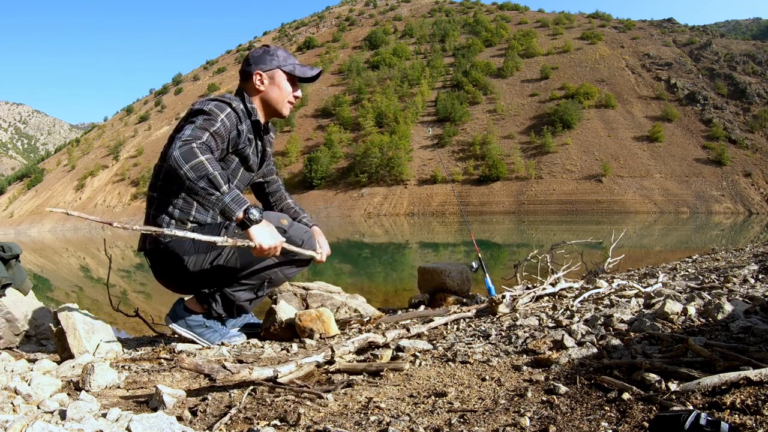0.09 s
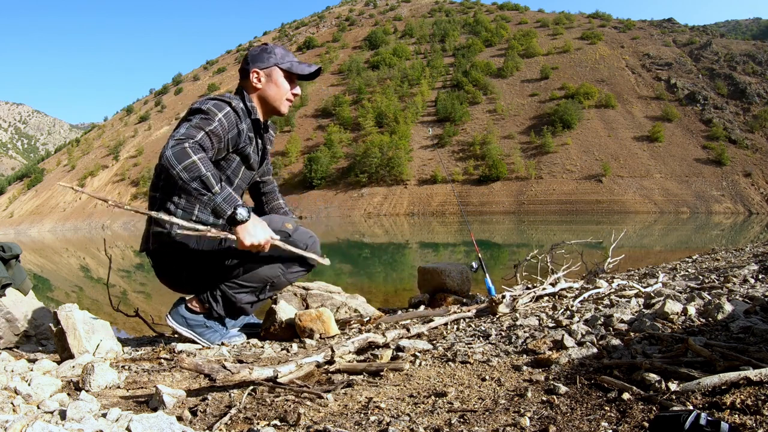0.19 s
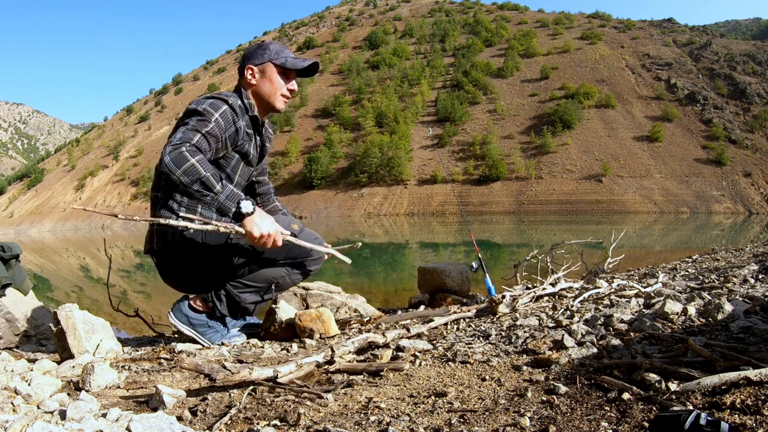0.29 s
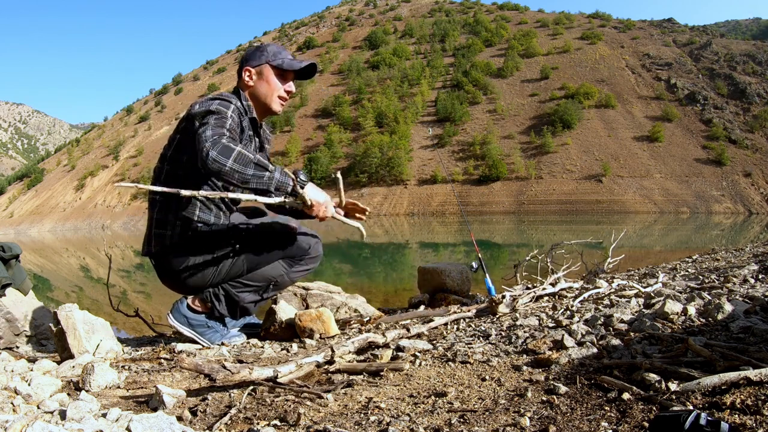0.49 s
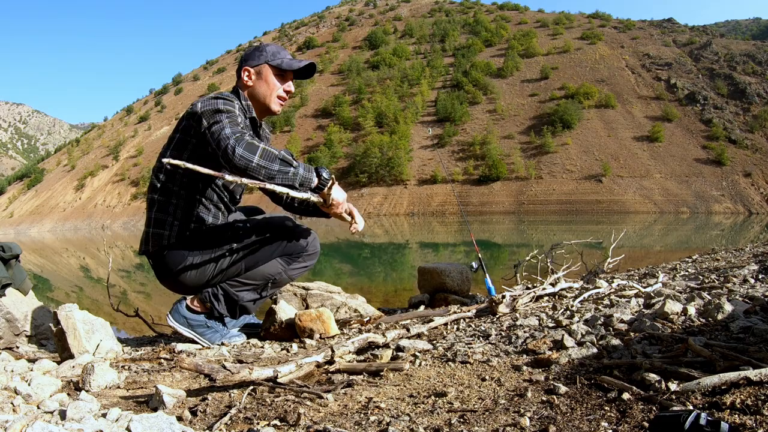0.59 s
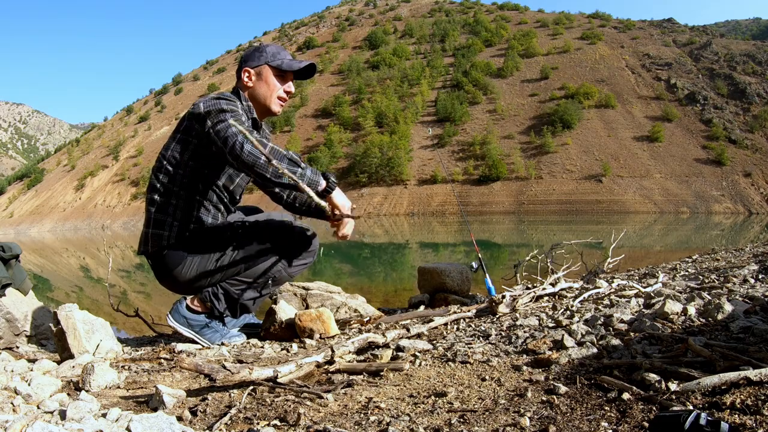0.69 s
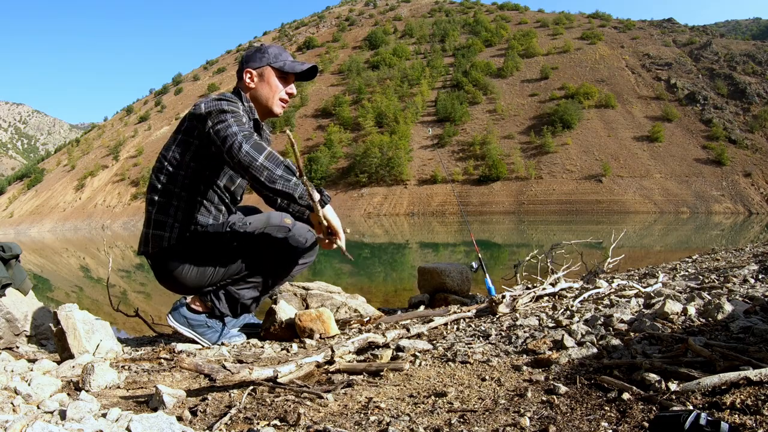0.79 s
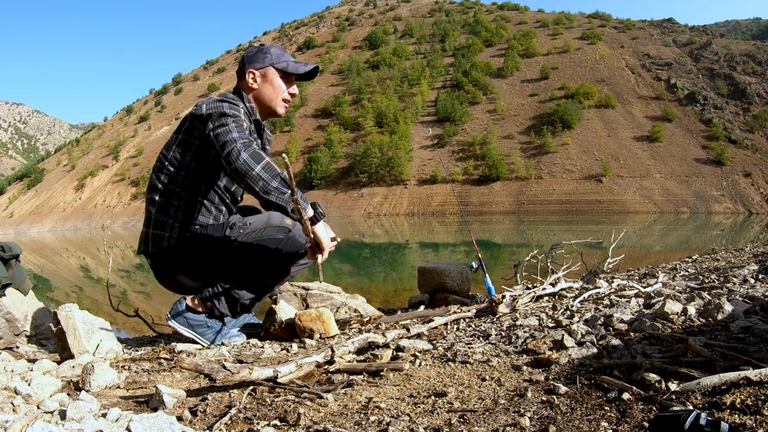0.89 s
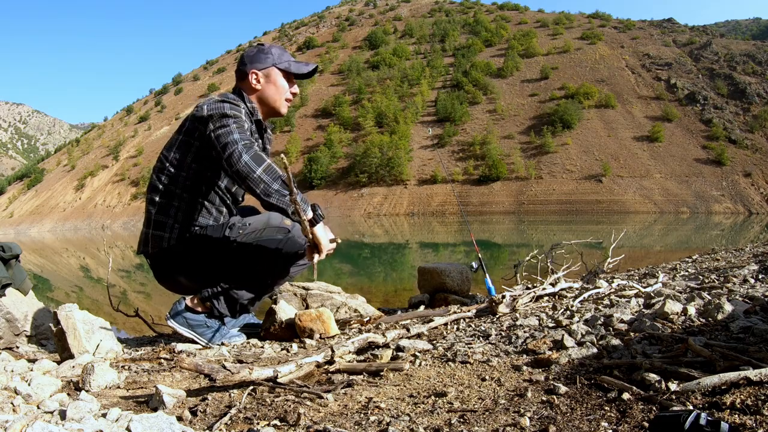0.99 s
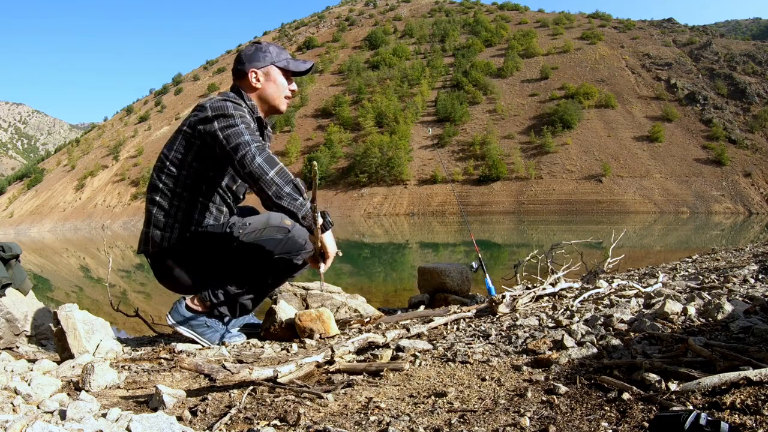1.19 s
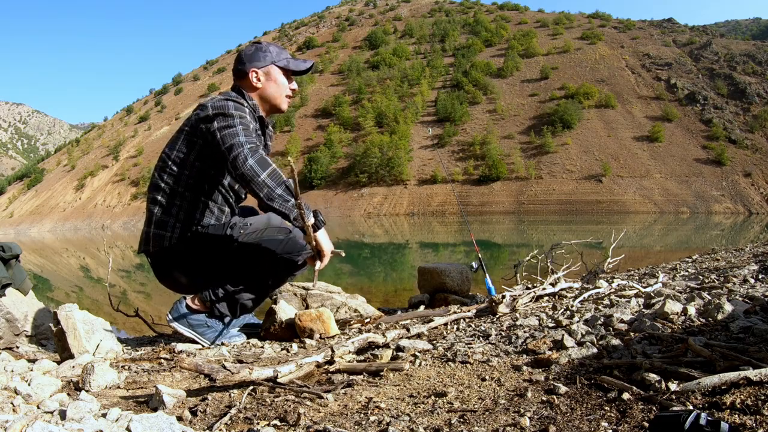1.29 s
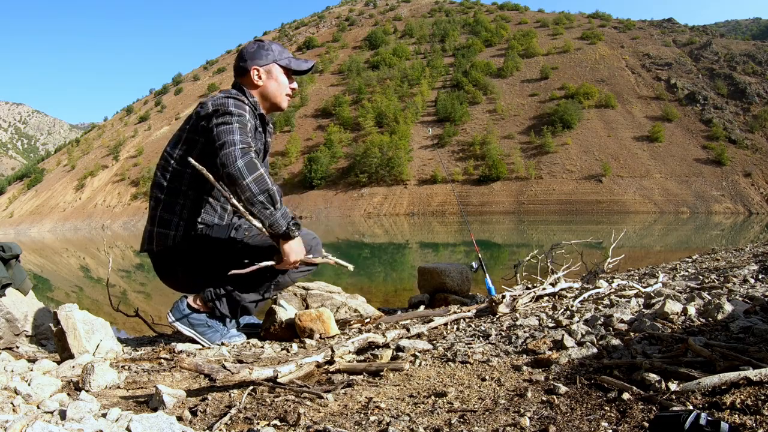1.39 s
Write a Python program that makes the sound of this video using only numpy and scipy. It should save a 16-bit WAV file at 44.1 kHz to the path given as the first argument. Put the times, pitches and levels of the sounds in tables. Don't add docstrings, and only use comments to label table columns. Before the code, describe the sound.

Dry sticks break in the hands: a sudden bright crack with a woody thud, twig ticks, a second creaking snap, then bounces, light scraping and fading ticks, two metres from a stereo camera microphone on a quiet shore.

```python
import sys
import numpy as np
from scipy import signal
from scipy.fft import rfft, irfft
from scipy.io import wavfile
from scipy.ndimage import uniform_filter1d

SR = 44100
rng = np.random.default_rng(int(sys.argv[2]) if len(sys.argv) > 2 else 0)


def log_audio(samples):
    frames = np.atleast_2d(samples).T
    limited = np.clip(frames, -1, 1)
    pcm = np.round(limited * 32767).astype(np.int16)
    wavfile.write(sys.argv[1], SR, pcm)


def voltage_ratio(decibels):
    exponent = np.asarray(decibels, float) / 20
    return 10 ** exponent


N = 61740


def evened(x):
    return x / np.sqrt(np.mean(x ** 2) + 1e-20)


def read(points, hz):
    f, value = np.transpose(points)
    return np.interp(np.log(hz + 1), np.log(f + 1), value)


def curve(points):
    s, db = np.transpose(points)
    last_db = db[-1] if s[-1] > 1.3 else -120
    return voltage_ratio(np.interp(np.arange(N) / SR, s, db, right=last_db))


def colour(x, points):
    gain_db = np.maximum(read(points, np.fft.rfftfreq(2048, 1 / SR)), -100)
    half = np.log(voltage_ratio(gain_db))
    full = np.r_[half, half[-2:0:-1]]
    response = np.fft.ifft(np.exp(np.conj(signal.hilbert(full)))).real
    return signal.oaconvolve(x, response)[:len(x)]


def resonate(x, hz, width):
    turn = np.exp(2j * np.pi * hz * np.arange(len(x)) / SR)
    r = np.exp(-np.pi * width / SR)
    return 2 * (turn * signal.lfilter([1 - r], [1, -r], x / turn)).real


def without_bass(x, order, low_hz):
    return signal.sosfilt(signal.butter(order, low_hz, "high", fs=SR, output="sos"), x)


def add(mix, s, sound):
    part = mix[round(s * SR):][:len(sound)]
    part += sound[:len(part)]


# pitch in Hz, level in dB.
CRACK_COLOUR = [(100, -49), (250, -11), (750, -10.5), (1900, -32), (4500, -4), (7800, -11.5),
                (10000, -14.5), (16000, -32.5)]
# pitch in Hz, level in dB.
RUSTLE_COLOUR = [(500, -47.5), (900, -17), (2200, -11.5), (3600, -4.5), (6500, -11), (10200, -13),
                 (16000, -14)]


def breaks(rows, q, share, after_db, low_hz):
    rise_s, rise_db, splinter_db, after_t60_s = .0007, -30, -3.5, 0.088
    out = np.zeros(N)
    t = np.arange(4000) / SR - rise_s
    for s, db, hz, t60 in rows:
        slope = np.where(t < 0, rise_db / rise_s, -60 / t60)
        jolt = voltage_ratio(splinter_db) * rng.standard_normal(len(t)) * voltage_ratio(slope * abs(t)) / 2
        jolt[round(rise_s * SR)] = 1
        ring = resonate(resonate(jolt, hz, hz / q), hz, hz / q)
        bare = colour(jolt, CRACK_COLOUR)
        snap = share * ring / abs(ring).max() + (1 - share) * bare / abs(bare).max()
        bark = evened(colour(rng.standard_normal(len(t)), RUSTLE_COLOUR))
        after = voltage_ratio(after_db - 60 * abs(t) / after_t60_s) * (t > 0) * bark
        add(out, s - rise_s, voltage_ratio(db) * (snap / abs(snap).max() + after))
    return without_bass(out, 4, low_hz)


def rings(rows, swell, turn, low_hz):
    t = np.arange(N) / SR
    rung = np.zeros(N)
    for k, (s, db, hz, t60) in enumerate(rows):
        length = t60 * np.where(t < s, swell, 1)
        loudness = voltage_ratio(db - 60 * abs(t - s) / length)
        rung += turn ** k * loudness * np.cos(2 * np.pi * hz * (t - s))
    return without_bass(rung, 2, low_hz)


def grains(per_s, spread_db):
    size = voltage_ratio(spread_db * np.minimum(rng.exponential(1, N), 4)) * rng.choice([-1., 1.], N)
    return evened(size * (rng.random(N) < per_s / SR))


# time in seconds, peak in dB, ring in Hz, time to fade by 60 dB in seconds.
FIRST_FIBRES = [
    (.2005, -48, 4400, 0.026),
    (.2092, -42.5, 4500, 0.014),
    (.2108, -27.5, 3980, 0.011),
    (.2192, -31.5, 4650, 0.015),
    (.2222, -18.5, 10200, .003),
    (.2242, -21, 9240, 0.0092),
    (.2256, -23.5, 6400, 0.004),
    (.2276, -30.5, 4700, 0.0081),
    (.2368, -40.5, 4500, 0.0027),
]
# peak time in seconds, peak in dB, pitch in Hz, 60 dB fade in seconds.
FIRST_MODES = [(.2221, -26.5, 2770, .014), (.2221, -15.5, 3430, .012), (.2221, -28.5, 4050, .014),
               (.2221, -11.5, 4460, 0.011), (.2221, -11.5, 5256, .007), (.2221, -21.5, 5850, .015),
               (.2232, -21.5, 6420, .011), (.2232, -27, 6860, .009), (.2221, -32, 8400, .012),
               (.2232, -30.5, 9040, .012), (.2221, -28.5, 9800, .012)]


def first_break():
    fibres = breaks(FIRST_FIBRES, q=1.8, share=0.53, after_db=-23, low_hz=1500)
    return fibres + rings(FIRST_MODES, swell=.18, turn=1, low_hz=785)


# time in seconds, peak in dB, ring in Hz, 60 dB fade in seconds.
SECOND_FIBRES = [
    (.5422, -31.5, 1294, 0.002),
    (.5431, -27, 3500, 0.003),
    (.5454, -21.5, 9000, .003),
    (.548, -22, 3900, 0.0047),
]
# peak time in seconds, peak in dB, pitch in Hz, 60 dB fade in seconds.
SECOND_MODES = [(.542, -30, 770, 0.0074), (.5425, -34, 1277, .012), (.5425, -31, 1535, .012),
                (.544, -37, 1920, 0.013), (.5455, -23, 2265, 0.012), (.545, -33, 2675, 0.017),
                (.5435, -29.5, 3270, 0.0125), (.546, -35, 3840, 0.012), (.544, -35, 4350, 0.011),
                (.544, -34.5, 5345, 0.017), (.5453, -14.5, 6070, 0.0037), (.545, -31.5, 6600, 0.0092),
                (.545, -31.5, 7760, 0.014), (.545, -33, 9240, 0.0047)]


def second_break():
    fibres = breaks(SECOND_FIBRES, q=3, share=0.41, after_db=-23.5, low_hz=573)
    return fibres + tear() + rings(SECOND_MODES, swell=0.81, turn=-1.006, low_hz=454)


# time in seconds, level in dB.
TEAR_LEVEL = [
    (.524, -80),
    (.531, -60),
    (.538, -53),
    (.543, -43),
    (.546, -43),
    (.551, -53),
    (.562, -60),
    (.575, -90),
]
# pitch in Hz, level in dB.
TEAR_COLOUR = [(400, -42.5), (700, 1.5), (2300, -5), (3000, -9.5), (6100, -6), (10000, -6), (16000, -19.5)]


def tear():
    return curve(TEAR_LEVEL) * evened(colour(grains(14000, 2.2), TEAR_COLOUR))


# time in seconds, peak in dB, ring in Hz, 60 dB fade in seconds.
TICKS = [(0.2586, -51, 6550, 0.014), (0.2657, -36, 7000, 0.012), (0.287, -32.5, 7100, 0.018),
         (0.297, -37, 6070, 0.0071), (0.2969, -37, 3000, 0.014), (0.3076, -32.5, 4280, 0.0055),
         (0.319, -38, 5660, 0.0063), (0.6405, -38.5, 3010, 0.011), (0.6913, -33, 3360, 0.0011),
         (.6915, -38, 5070, 0.0043), (.694, -39, 3430, 0.0053), (0.7028, -39.5, 3600, 0.01),
         (0.7345, -44, 5560, 0.0027), (0.7586, -30.5, 3510, 0.0034), (.7587, -33, 5900, 0.0079),
         (.7605, -40, 9300, 0.0051), (0.7705, -47, 6240, 0.0089), (0.7844, -49, 3360, 0.0069),
         (0.8245, -42, 7200, 0.043), (0.8746, -41.5, 5300, 0.027),
         (0.6425, -32.5, 4000, 0.036),
    (0.6497, -37.5, 3470, 0.029),
    (0.657, -46.5, 3550, 0.071),
    (0.7383, -39, 3600, 0.005),
    (.742, -44, 6500, 0.0086),
    (0.843, -38.5, 9200, 0.013),
    (0.301, -41, 4770, 0.011),
]
# time in seconds, peak in dB, ring in Hz, 60 dB fade in seconds.
THIN_TICKS = [(.9046, -46, 3720, .008), (.9095, -41, 3730, 0.012), (.9615, -48, 4300, 0.0093),
              (.963, -45.5, 6360, 0.0074), (.984, -56, 6100, 0.0035), (.9925, -47.5, 9200, .004),
              (.999, -43, 2740, .015), (1.001, -50, 6500, 0.014), (1.044, -47.5, 4700, 0.0055),
              (1.044, -53.5, 9700, 0.0061), (1.083, -52.5, 6500, .006), (1.087, -52.5, 5050, 0.0072),
              (1.108, -62, 12000, 0.0036), (1.1507, -52.5, 3180, 0.0051), (1.178, -61, 9100, 0.0036),
              (1.1975, -53.5, 4980, 0.028), (1.21, -58.5, 5400, .008), (1.247, -58, 4200, 0.045),
              (1.2915, -47.5, 3617, 0.0098), (1.3753, -61, 3920, .006)]


def ticks():
    plain = breaks(TICKS, q=2.4, share=0.61, after_db=-27.0, low_hz=1500)
    return plain + breaks(THIN_TICKS, q=6.1, share=0.67, after_db=-16.5, low_hz=1500)


# time in seconds, peak in dB, ring in Hz, 60 dB fade in seconds.
KNOCKS = [(.01, -63.5, 338, 0.11), (.072, -54.5, 1500, 0.0057), (.305, -59.5, 347, 0.044),
          (.48, -59, 760, .015), (.288, -53.5, 780, 0.0019), (.297, -54, 710, 0.0052),
          (.35, -54.5, 910, 0.0092), (.416, -52, 1500, 0.055), (.422, -60, 350, 0.0097),
          (.641, -43, 732, 0.004), (.643, -48.5, 1180, 0.044), (.642, -55.5, 292, 0.035),
          (.65, -51, 750, 0.027), (.739, -56, 800, 0.016), (.875, -58, 1190, 0.011),
          (1.31, -63.5, 218, 0.034), (.547, -52.5, 373.4, 0.029)]
# peak time in seconds, peak in dB, pitch in Hz, 60 dB fade in seconds.
THUD = [
    (.226, -58, 95, 0.067),
    (.2225, -39.5, 204, .02),
    (.2225, -32.5, 362, 0.013),
    (.2225, -35, 514, 0.016),
    (.2225, -30.5, 775, 0.0099),
    (.2225, -35, 1350, 0.0059),
]


def knocks():
    bass_cut_hz = 70
    hollow = breaks(KNOCKS, q=2.97, share=0.57, after_db=-71, low_hz=bass_cut_hz)
    return hollow + rings(THUD, swell=0.44, turn=-1.11, low_hz=bass_cut_hz)


def crackle():
    flutter_db, flutter_s = 2.2, .015
    span = round(flutter_s * SR)
    grip = uniform_filter1d(uniform_filter1d(rng.standard_normal(N), size=span), size=span)
    fizz = 1.5 * rng.standard_normal(N)
    return voltage_ratio(flutter_db * evened(grip)) * (grains(3900, 4.5) + fizz)


# time in seconds, level in dB.
HANDLING = [
    [(0, -62), (.07, -63.5), (.082, -120), (.11, -66), (.135, -117), (.16, -100)],
    [(.187, -80), (.245, -63), (.28, -58.5), (.33, -55), (.385, -70), (.415, -63), (.43, -77), (.52, -77),
     (.53, -99)],
    [(.54, -92.5), (.57, -60.5), (.6, -65), (.68, -64), (.73, -58), (.82, -50), (.89, -64), (.965, -60.5),
     (1.02, -74.5), (1.4, -77)],
]
STROKE_TILT = [-.7, .1, .3]
# pitch in Hz, width in Hz, level in dB.
TWIG_RINGS = [(3600, 550, -0.5), (4700, 1400, -2.5), (6500, 1000, -0.5), (9200, 1000, -8.5)]


def rustle():
    bed = voltage_ratio(-2) * evened(colour(crackle(), RUSTLE_COLOUR))
    for hz, width, db in TWIG_RINGS:
        bed += voltage_ratio(db) * evened(resonate(resonate(crackle(), hz, width), hz, 2 * width))
    spectrum = rfft(bed)
    hz = np.fft.rfftfreq(N, 1 / SR)
    out = np.zeros(N)
    for stroke, tilt in zip(HANDLING, STROKE_TILT):
        tilted = irfft(spectrum * (1 + hz / 3000) ** (2 * tilt), N)
        out += curve(stroke) * evened(tilted)
    return out


# time in seconds, level in dB.
SCRAPE_LEVEL = [
    (.68, -80.5),
    (.8, -68.5),
    (.88, -68.5),
    (.92, -71.5),
    (1.0, -71),
    (1.09, -66.5),
    (1.13, -74),
    (1.2, -82),
]
# pitch in Hz, width in Hz.
SCRAPE_RINGS = [(1700, 120), (2100, 350)]


def scrape():
    slips = grains(4000, 2)
    ringing = sum(resonate(resonate(slips, hz, width), hz, 2 * width) for hz, width in SCRAPE_RINGS)
    return curve(SCRAPE_LEVEL) * evened(ringing)


# pitch in Hz, level in dB.
AIR_COLOUR = [(25, -12), (115, -22), (150, -2.5), (350, -11), (750, -10.5), (2300, -18.5), (10000, -32.5),
              (16000, -42)]
# pitch in Hz, likeness from 0 to 1.
AIR_SAME = [(30, 0.24), (150, 0.21), (500, 0.2), (2000, 0.2), (8000, .5), (16000, 0.36)]


def air():
    air_db, hum_db, hum_hz, hum_width_hz = -70, -83.5, 165, 21
    frames, hz = N // 256 + 5, np.fft.rfftfreq(1024, 1 / SR)
    a, b, c, d, patches = rng.standard_normal((frames, 513, 5)).T
    patches = uniform_filter1d(uniform_filter1d(patches, size=10, axis=0), size=10, axis=1)
    loudness = voltage_ratio(read(AIR_COLOUR, hz)[:, None] + 0.64 * evened(patches))
    same = read(AIR_SAME, hz)[:, None]
    left = a + 1j * b
    right = same * left + np.sqrt(1 - same ** 2) * (c + 1j * d)
    hush = signal.istft(np.array([left, right]) * loudness, nperseg=1024, noverlap=768)[1][:, :N]
    hum = resonate(resonate(rng.standard_normal(N), hum_hz, hum_width_hz), hum_hz, hum_width_hz)
    return voltage_ratio(air_db) * evened(hush) + voltage_ratio(hum_db) * evened(hum)


# pitch in Hz, level in dB.
WIDE = [(200, -13.5), (800, -4), (1500, 3.5), (2500, -24), (5000, -3.5), (9000, -7.5), (14000, -4)]


def placed(x, pan_db):
    port_s, stones_db, stones_t60_s = 0.00026, -16, .03
    hz, t = np.fft.rfftfreq(N, 1 / SR), np.arange(1500) / SR
    side = irfft(1j * rfft(x) * voltage_ratio(read(WIDE, hz)) * np.cos(2 * np.pi * hz * port_s), N)
    taps = rng.standard_normal(len(t)) * voltage_ratio(-60 * t / stones_t60_s)
    side += voltage_ratio(stones_db) * signal.oaconvolve(x, taps / np.linalg.norm(taps))[:N]
    return np.array([voltage_ratio(pan_db / 2) * x + side, voltage_ratio(-pan_db / 2) * x - side])


def scene():
    sticks = placed(first_break(), pan_db=.4) + placed(second_break(), pan_db=-4)
    twigs = placed(ticks() + rustle() + scrape(), pan_db=0.45)
    return sticks + twigs + placed(knocks(), pan_db=-1.3) + air()


def top_cut(x):
    return signal.sosfilt(signal.butter(12, 16480, fs=SR, output="sos"), x)


# pitch in Hz, level in dB.
MIC = [(2000, 0), (10400, 0.5), (11600, -7), (14500, -5), (16200, -27)]


def record(dry):
    port = np.array([colour(channel, MIC) for channel in dry])
    low_pass = signal.firwin(511, 16250, window=("kaiser", 9), fs=SR)
    mix = signal.oaconvolve(port, low_pass[None], "same")
    return top_cut(mix)


dry = scene()
out = record(dry)
log_audio(out)
```